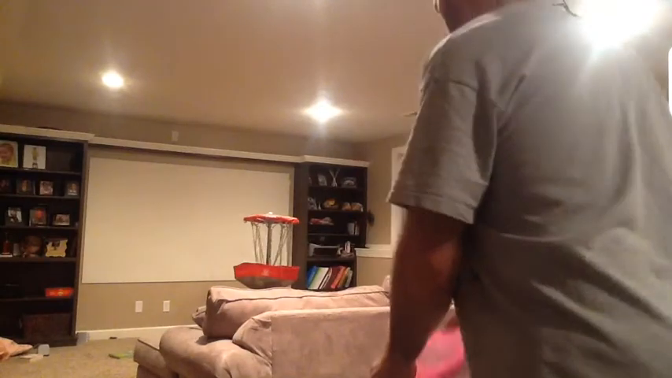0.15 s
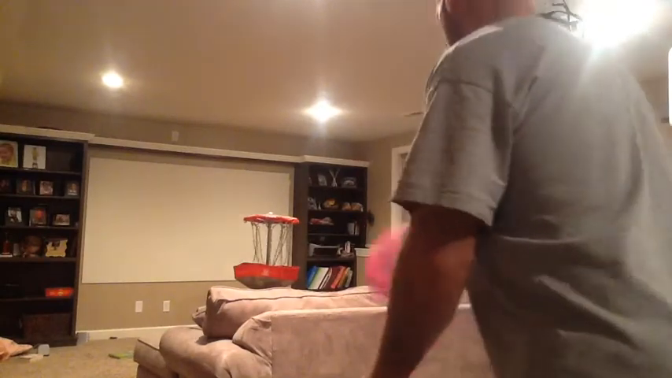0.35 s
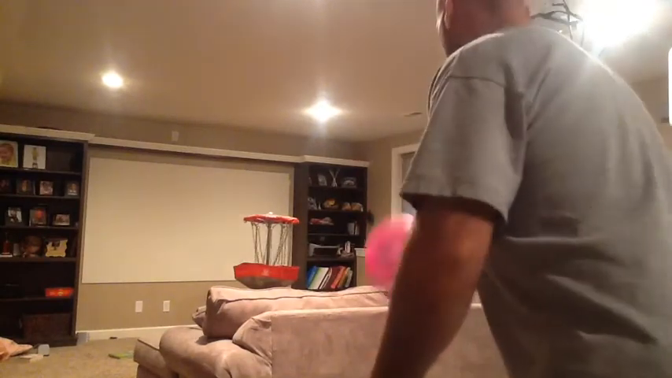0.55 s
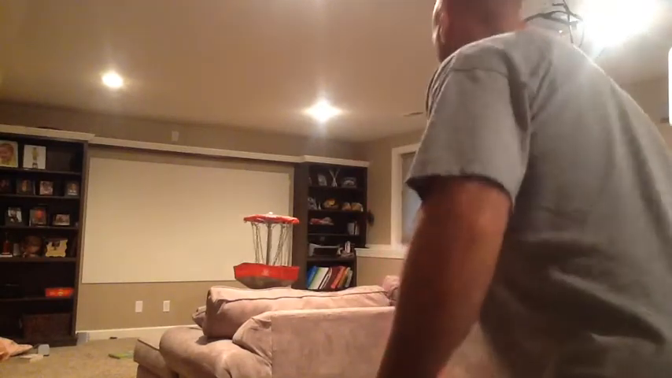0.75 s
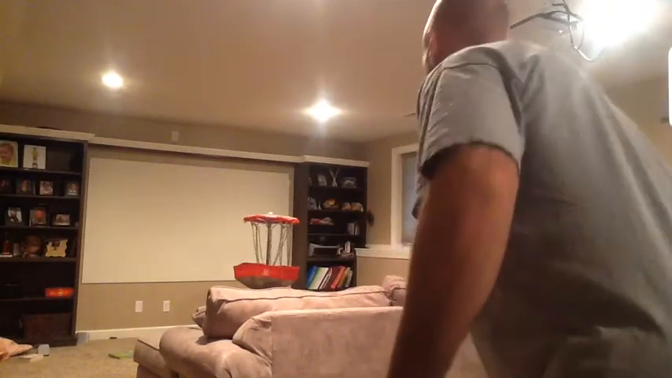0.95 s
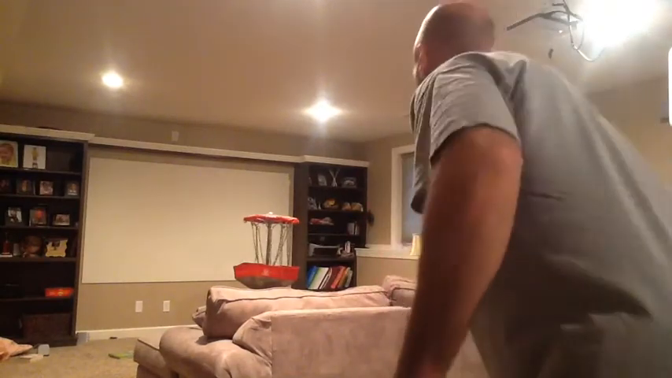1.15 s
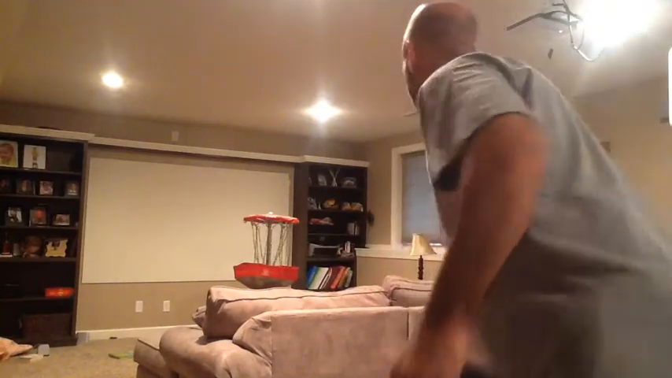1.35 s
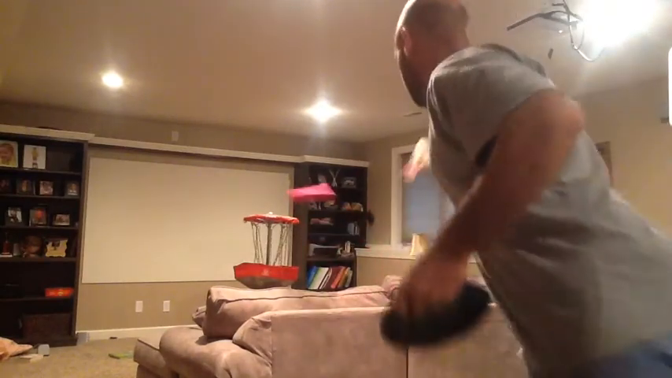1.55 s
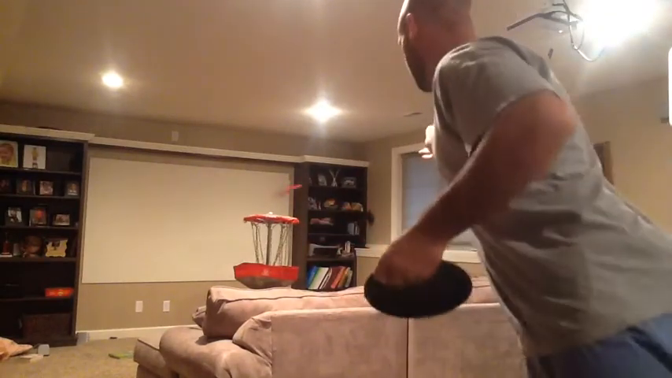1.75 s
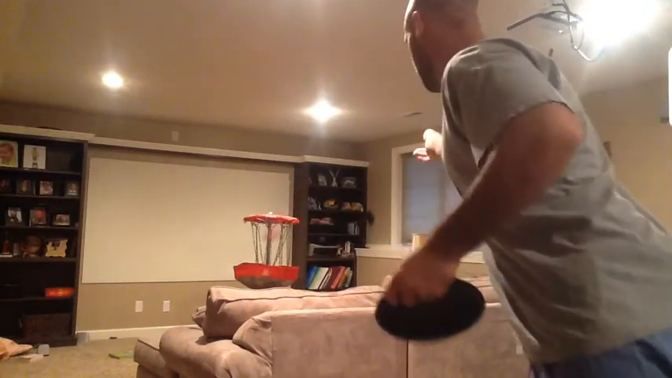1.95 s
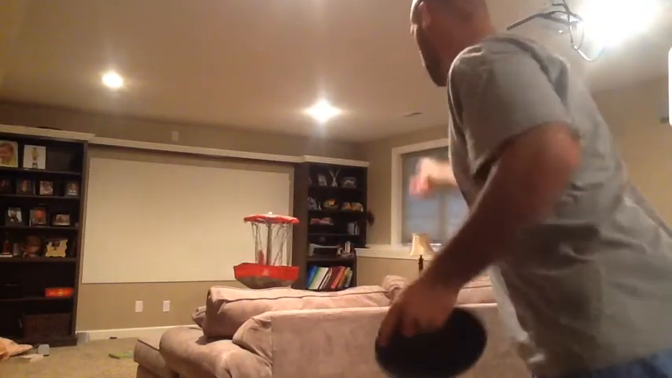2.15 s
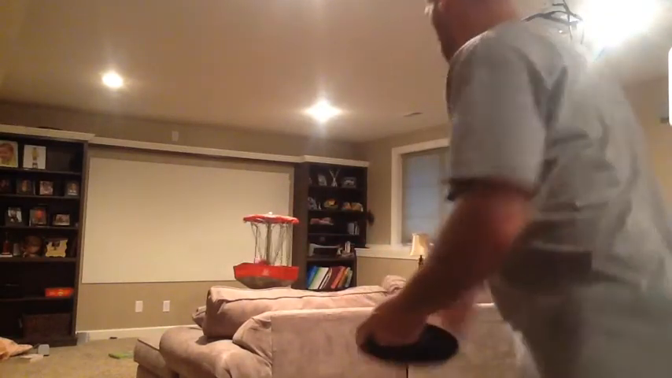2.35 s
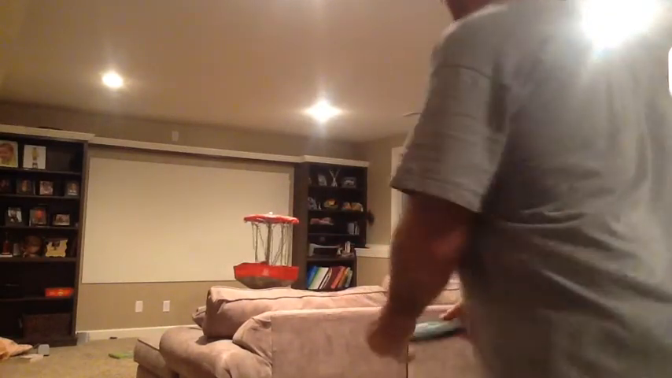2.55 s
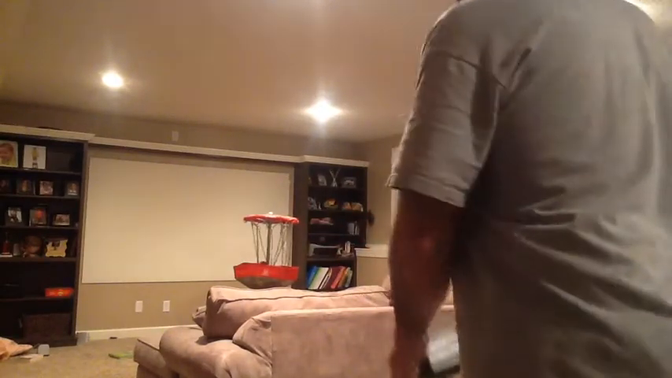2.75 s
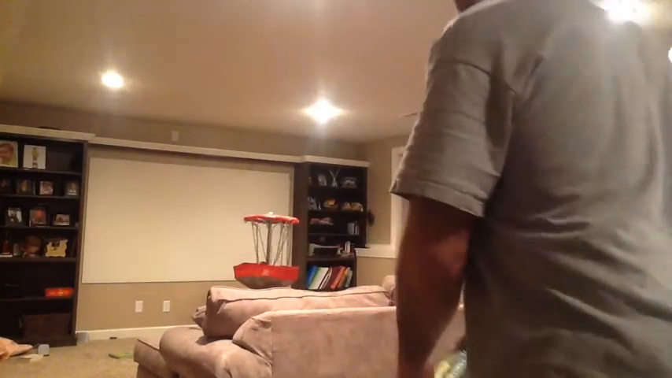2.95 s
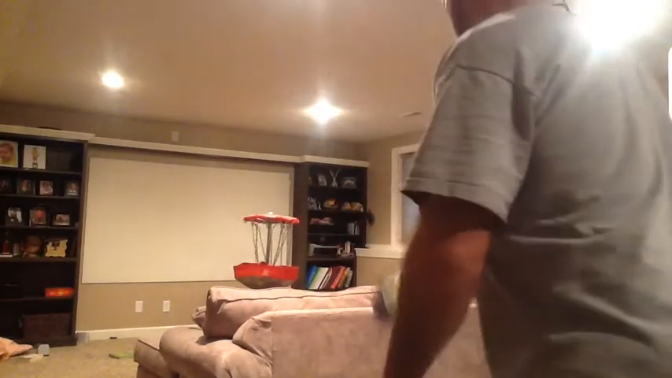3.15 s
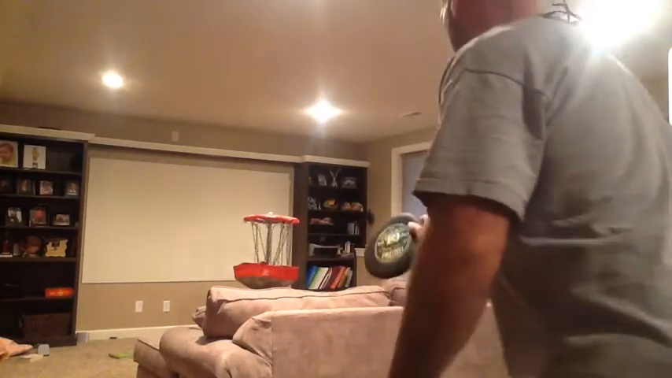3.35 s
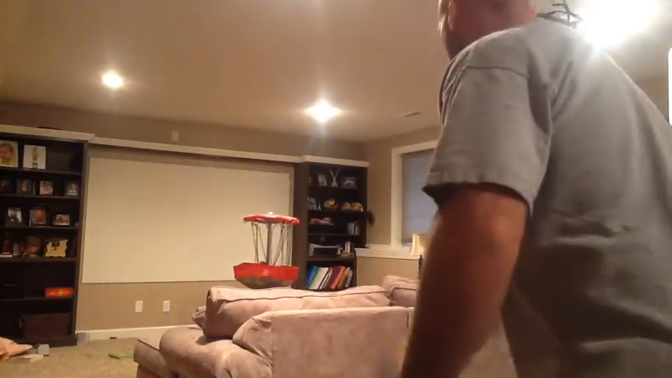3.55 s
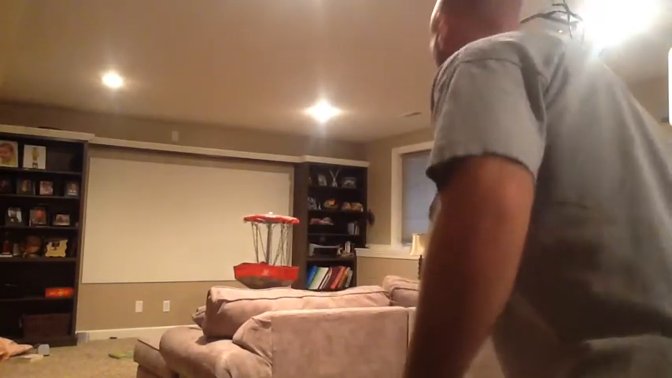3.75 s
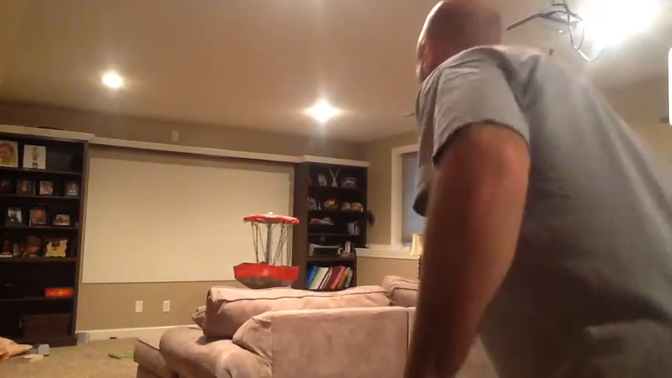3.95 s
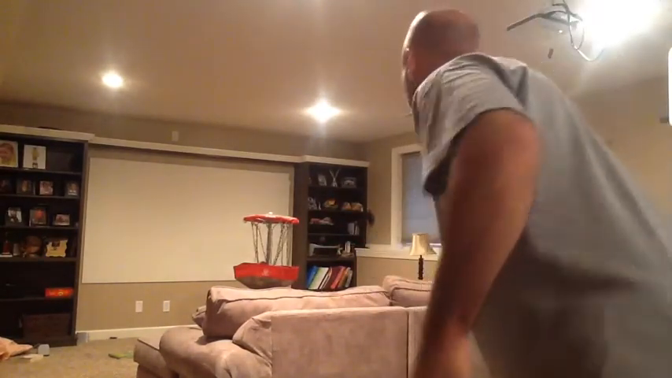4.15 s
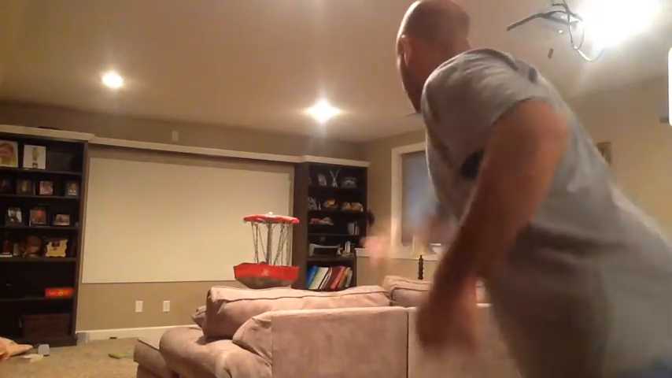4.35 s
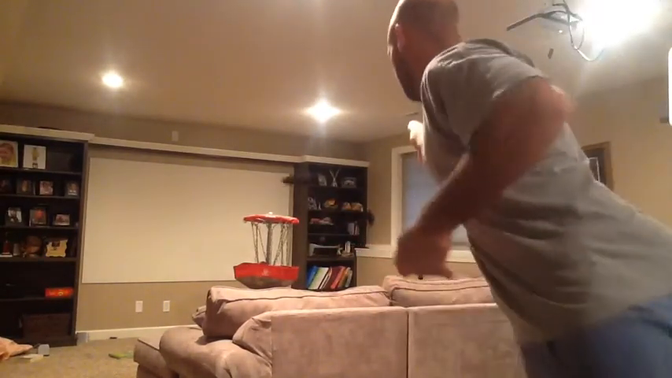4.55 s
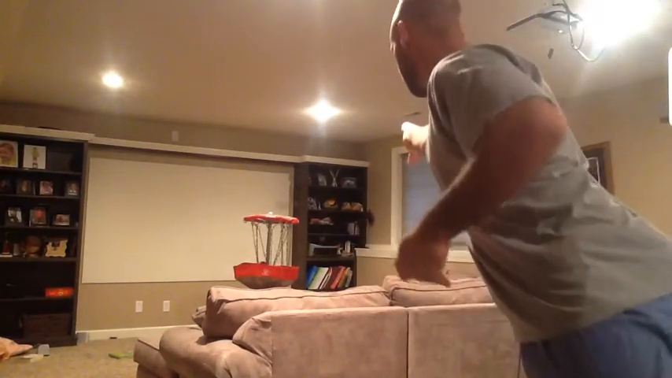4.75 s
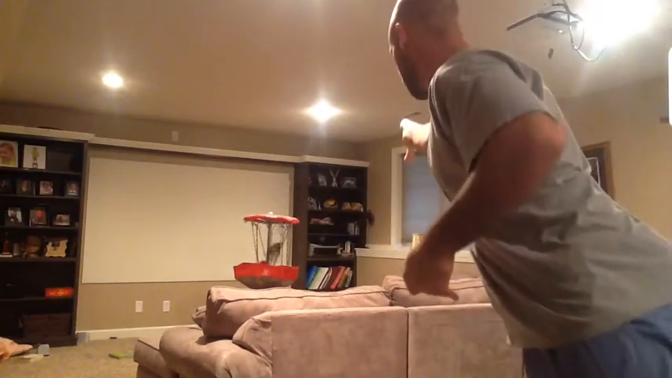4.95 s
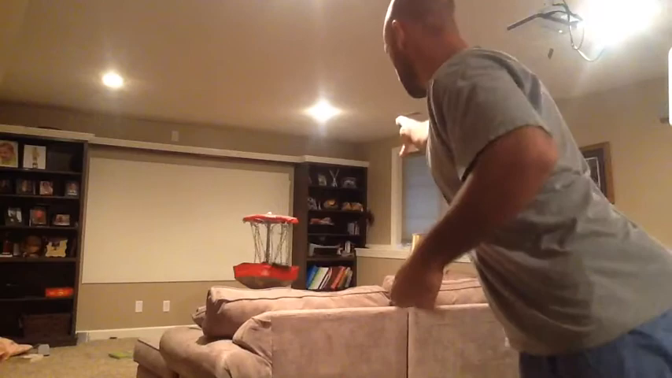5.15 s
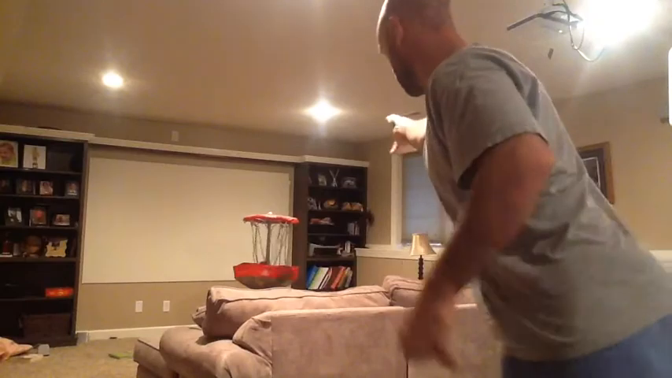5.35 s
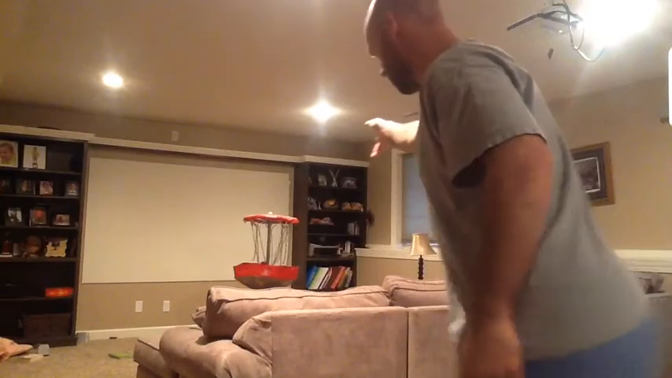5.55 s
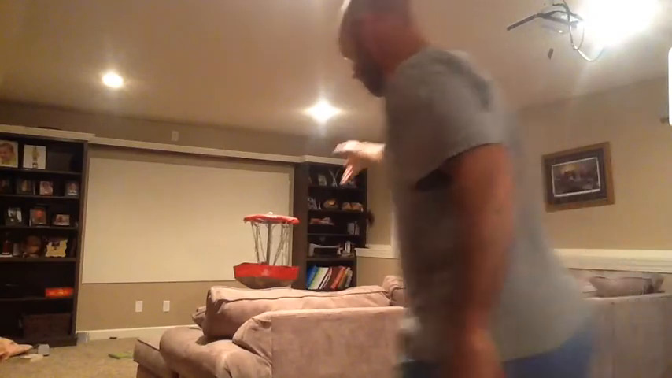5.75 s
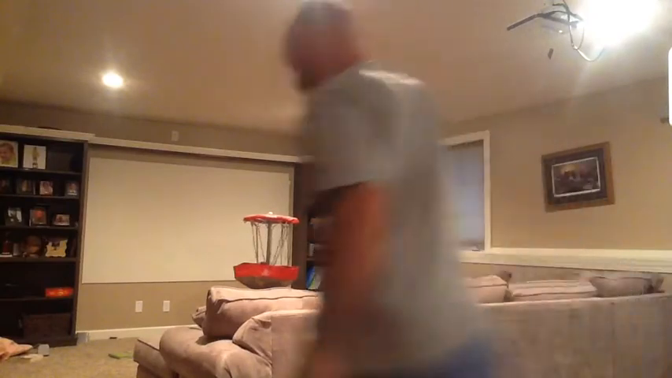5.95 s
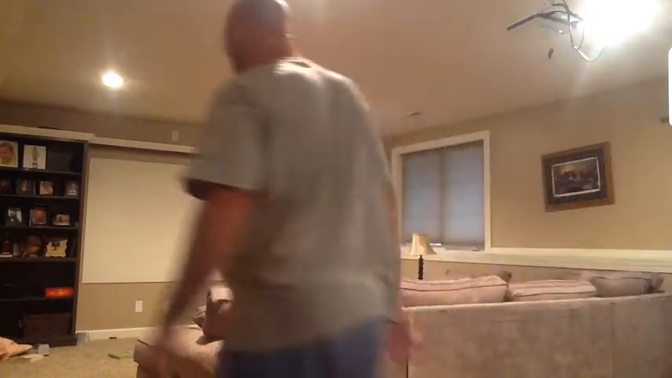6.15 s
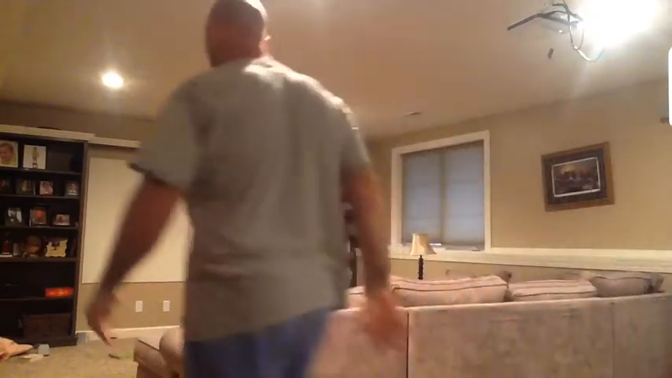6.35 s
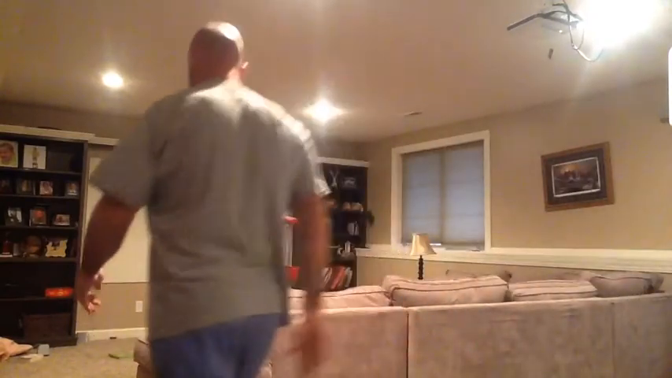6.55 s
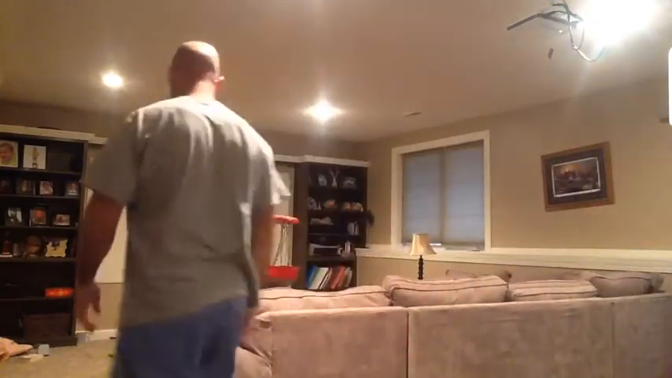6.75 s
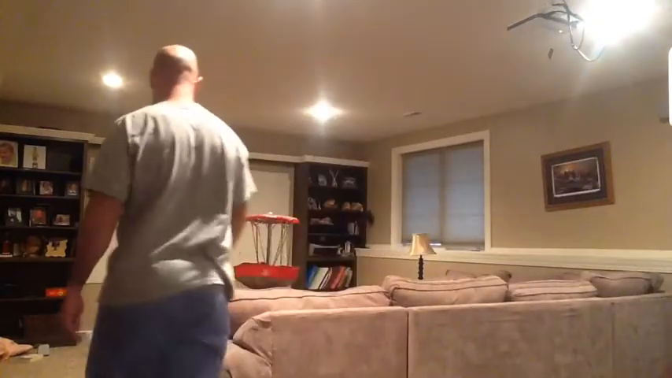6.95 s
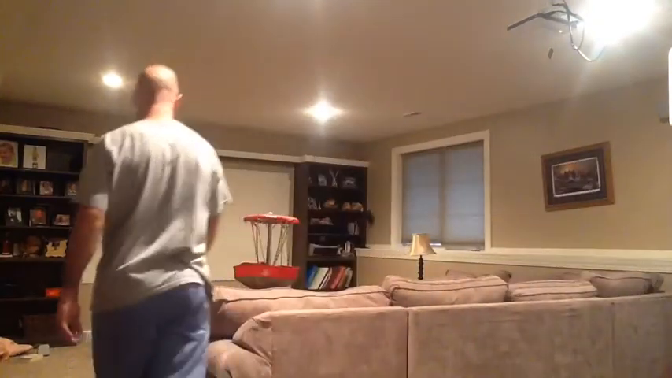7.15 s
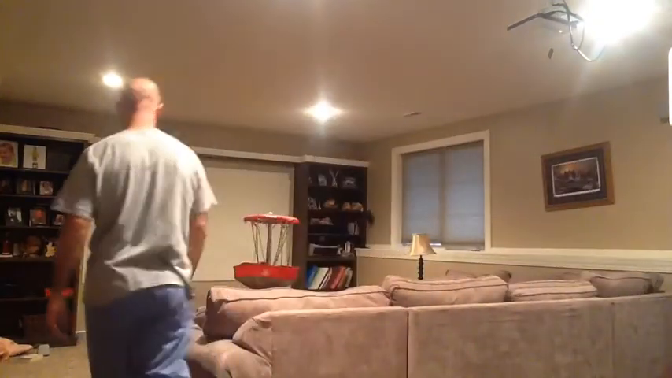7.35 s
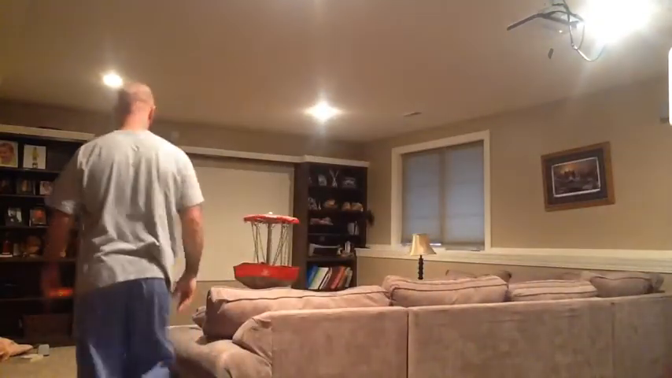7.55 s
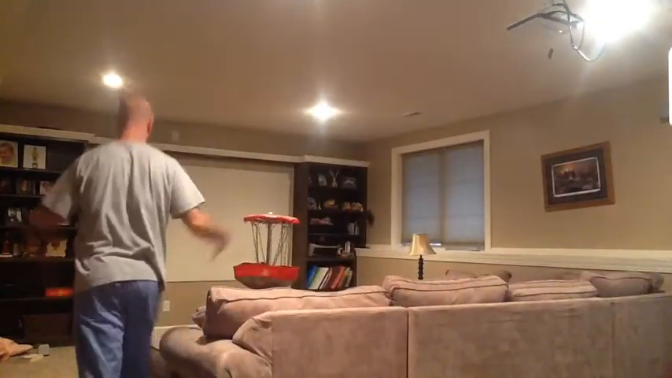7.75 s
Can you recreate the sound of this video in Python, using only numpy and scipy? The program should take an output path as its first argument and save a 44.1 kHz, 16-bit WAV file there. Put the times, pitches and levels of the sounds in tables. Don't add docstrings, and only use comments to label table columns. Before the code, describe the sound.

In a small carpeted room, cloth rustles close by, then two plastic discs crash into hanging chains seconds apart, jangling brightly over hiss.

```python
import sys
import numpy as np
from scipy import signal
from scipy.fft import rfft, irfft, next_fast_len
from scipy.io import wavfile
from scipy.ndimage import uniform_filter1d

SR = 44100
rng = np.random.default_rng(int(sys.argv[2]) if len(sys.argv) > 2 else 0)


def elevation(decibels):
    levels = np.asarray(decibels, float)
    return 10 ** (levels / 20)


def materialize(psi):
    bounded = np.clip(np.atleast_2d(psi).T, -1, 1)
    quanta = np.round(bounded * 32767).astype(np.int16)
    wavfile.write(sys.argv[1], SR, quanta)


N = 347949

LINK_HZ = 11100, 12950, 13990
# t/s, rattle level/dB, disc drumming level/dB, link clink level/dB
TANGLES = [(2.052, -26, -26, -24), (2.063, -25, -29.5, -22), (2.084, -13.5, -36.5, -20),
           (2.108, -26, -49.5, -28), (2.157, -27, -44.5, -26), (2.177, -28, -41, -28),
           (2.24, -40.5, -48, -36), (2.32, -47, -47, -42), (2.375, -45.5, -38.5, -38),
           (2.49, -57, -48, -31), (2.61, -56.5, -53.5, -44), (4.951, -25, -24.5, -20),
           (4.981, -18, -29.5, -14), (5.022, -29.5, -31.5, -22), (5.106, -29.5, -44.5, -30),
           (5.124, -26.5, -40.5, -24), (5.179, -36.5, -49, -34), (5.276, -34, -52, -34),
           (5.292, -31.5, -46, -21), (5.38, -40, -51, -27), (5.506, -45, -51, -36),
           (5.575, -25.5, -49, -20.5), (5.622, -39, -61.5, -36), (5.76, -50, -55, -38)]


def rms_one(x):
    return x / np.sqrt(np.mean(x ** 2) + 1e-20)


def at_hz(points, hz):
    point_hz, values = np.transpose(points)
    return np.interp(np.log(hz + 1), np.log(point_hz), values)


def colour(x, spectrum):
    size = next_fast_len(len(x))
    hz = np.fft.rfftfreq(size, 1 / SR)
    shaped = irfft(rfft(x, size) * elevation(at_hz(spectrum, hz)), size)
    return rms_one(shaped[:len(x)])


def ring(clicks, hz, t60):
    radius = elevation(-60 / (t60 * SR))
    angle = 2 * np.pi * hz / SR
    feedback = [1, -2 * radius * np.cos(angle), radius * radius]
    return signal.lfilter([0, np.sin(angle)], feedback, clicks + 1e-18)


def butter(x, order, hz, kind):
    return signal.sosfilt(signal.butter(order, hz, kind, fs=SR, output="sos"), x)


def add(out, s, sound):
    i = round(s * SR)
    out[i:i + len(sound)] += sound[:N - i]


def grains(per_s, spread_db):
    sizes = elevation(spread_db * np.minimum(rng.exponential(1, N), 4)) * rng.choice([-1, 1], N)
    return rms_one(sizes * (rng.random(N) < per_s / SR))


def flutter(depth_db, span):
    wander = uniform_filter1d(uniform_filter1d(rng.standard_normal(N), span), span)
    return elevation(depth_db * rms_one(wander))


def swells(moves):
    t = np.arange(N) / SR
    return sum(elevation(db) * np.exp(-((t - s) / half) ** 2) for s, db, half in moves)


def microphone_hiss():
    # f/Hz, density/dB
    hiss_spectrum = [(24, -52), (40, -22.5), (91, -23.5), (169, -5.5), (792, -12.5), (1400, -12),
                     (1760, -11), (1890, -12.5), (15300, -12)]
    # t/s, level/dB
    hiss_level = [(0, -64.5), (1.1, -63.5), (2.0, -63.5), (2.9, -66.5), (4.9, -63.5), (5.9, -62.5),
                  (6.7, -64.5), (7.89, -63)]
    level_db = np.interp(np.arange(N) / SR, *np.transpose(hiss_level))
    return colour(rng.standard_normal(N), hiss_spectrum) * elevation(level_db + 5.5)


def thrower():
    # middle t/s, level/dB, half length/s
    shuffles = [(.3, -64.5, .05), (.553, -71, .091), (1.398, -64, .063), (1.527, -64, .09),
                (1.81, -73, .28), (3.25, -76, .076), (4.218, -64, .073), (4.397, -63, .1),
                (4.7, -75.5, .14), (5.8, -63, .08), (6.07, -65.5, .075), (6.3, -68, .1), (6.48, -61.5, .12),
                (6.985, -59, .045), (7.1, -59.5, .08), (7.441, -68, .15), (7.64, -63.5, .13)]
    # f/Hz, density/dB
    rustle_spectrum = [(41, -52.5), (70, -22.5), (128, -1), (240, -3), (362, -3.5), (794, -6.5),
                       (1100, -15), (5000, -24.5), (6500, -48), (11000, -120)]
    # middle t/s, level/dB, half length/s
    throws = [
        (.47, -66, .07),
        (1.45, -64, .14),
        (4.33, -64, .1),
    ]
    house_rumble_db = -70
    lumps = rms_one(uniform_filter1d(rng.standard_normal(N), 1500))
    rustle = colour(rng.standard_normal(N) * elevation(2.5 * lumps), rustle_spectrum)
    sleeve = rms_one(butter(grains(per_s=2500, spread_db=3.0), 2, (400, 2000), "band"))
    return rustle * (elevation(house_rumble_db) + swells(shuffles)) + sleeve * swells(throws)


def clacks():
    # t/s, peak level/dB, bright part level/dB
    dull_clacks = [(.0024, -41.5, 2), (.0588, -32, -7), (.1174, -41.5, -5), (.2096, -50, -10),
                   (.4155, -33, 1), (.4678, -34, -5), (.5494, -39, -10), (.5807, -41, -6), (.9304, -47, -3),
                   (.969, -45, -20), (1.1777, -39, -8), (1.4295, -45.5, -7), (1.7853, -45.5, -3),
                   (2.3875, -30, -14), (2.6122, -41, -3), (2.931, -48, -14), (3.1333, -46, -8),
                   (3.1517, -37, -5.5), (3.6367, -40.5, -24.5), (4.336, -46, -7.5), (5.3814, -34, 3),
                   (5.4445, -29.5, -8.5), (5.6983, -36.5, 2), (5.7578, -31.5, -1.5), (5.8934, -43, -13),
                   (5.9665, -44, -10.5), (6.0371, -35.5, -6), (6.4028, -43.5, -17.5), (6.921, -48.5, -7.5),
                   (7.5804, -54, -1.5)]
    # t/s, peak level/dB, centre f/Hz
    pitched_clacks = [
        (4.9815, -15, 6640),
        (4.9815, -11, 4210),
        (5.1223, -22, 4940),
        (5.2939, -22, 5740),
        (5.544, -33, 5140),
        (6.1164, -42.5, 6610),
        (6.255, -48, 4500),
        (6.6887, -49, 4670),
        (7.0234, -49, 4430),
        (7.2078, -44, 6590),
    ]
    pitched_bright_db = -7
    out, t = np.zeros(N), np.arange(SR // 5) / SR
    centres = 4700 * (1 + .035 * rng.standard_normal(len(dull_clacks)))
    rows = [(s, db, hz, bright_db) for (s, db, bright_db), hz in zip(dull_clacks, centres)]
    rows += [(*row, pitched_bright_db) for row in pitched_clacks]
    for s, db, hz, bright_db in rows:
        noise = rng.standard_normal(len(t))
        bright = elevation(bright_db + 3.5) * signal.lfilter([1, 0, -1], [1], noise)
        hump = rms_one(ring(ring(noise, hz, 4.2 / hz), hz, 8.9 / hz))
        envelope = elevation(db - 10 - 60 * t / .14) * (1 - np.exp(-t / .0026))
        add(out, s, envelope * (hump + bright))
    return out


def links():
    # t/s, peak level/dB, second mode level/dB
    sway_clinks = [(.0169, -42, -26), (.0706, -39.5, -21), (.121, -55, -8), (.2124, -43.5, -13.5),
                   (.4304, -41.5, -10.5), (.4707, -41.5, -11.5), (.5462, -42, -13), (.584, -45, -10),
                   (.707, -46.5, -24), (.925, -32, 9.5), (.9624, -43.5, -10), (1.184, -48, -19),
                   (1.4281, -49.5, -3.5), (1.9161, -34, 4.5), (2.2111, -26.5, -13), (2.3524, -32.5, -1.5),
                   (2.3844, -30, -15.5), (2.4541, -36, -12), (2.576, -33, -11), (2.6304, -40.5, -4),
                   (2.7298, -37, -8), (2.740, -27, 2), (2.8258, -31, -7), (2.8794, -33.5, -18),
                   (2.953, -45, -12), (3.1567, -46, -11), (3.238, -52, -8), (3.6376, -52, -3),
                   (4.336, -55, -6), (4.9634, -15, -6.5), (5.0476, -27, -12), (5.0879, -30, -4),
                 (5.25, -35, -11.5), (5.6446, -32, -8), (5.6696, -34, -17.5), (5.892, -52, -8),
                 (5.965, -48.5, -13), (6.0211, -37, 5), (6.1169, -32, -2), (6.1435, -32, -10),
                 (6.248, -31, -8), (6.2694, -39, -2), (6.2933, -38.5, 3), (6.3133, -41, -4),
                 (6.3347, -29, -3), (6.3724, -32, -17), (6.918, -40, -7), (6.997, -38.5, 2.5),
                 (7.095, -35, -14), (7.204, -23, -33), (7.2132, -22, -27), (7.2294, -47, 18.5),
                 (7.2761, -43, -16), (7.5806, -53, -14)]
    mode_t60_s, detune_spread = (.21, .24, .24), .0055
    crash_second_db = -4
    out, t = np.zeros(N), np.arange(SR // 3) / SR
    clinks = sway_clinks + [(s, db, crash_second_db) for s, _, _, db in TANGLES]
    rise = 1 - np.exp(-t / .0025)
    for s, db, second_db in clinks:
        tick = butter(rng.standard_normal(len(t)), 3, [10500, 14500], "band")
        add(out, s, elevation(db - 7 - 60 * t / .1) * tick * rise)
        third_db = min(second_db, -2) - 3
        for hz, t60, mode_db in zip(LINK_HZ, mode_t60_s, (0, second_db, third_db)):
            detune = detune_spread * rng.standard_normal((3, 1)) * [[.5], [1.2], [1.7]]
            tones = np.sin(2 * np.pi * hz * (1 + detune) * t)
            add(out, s, elevation(db + mode_db - 6.5 - 60 * t / t60) * rise * ([.9, .55, .4] @ tones))
    return out


def pings():
    # t/s, peak level/dB, f/Hz, t60/s
    wire_pings = [(.0588, -37, 4330, .08), (.064, -42, 5400, .06), (.21, -52, 4300, .05),
                  (.276, -52, 4900, .05), (.416, -40, 5100, .05), (.551, -48, 4340, .05),
                  (.58, -50, 5000, .05), (.772, -51, 4900, .04), (.774, -53, 5700, .04),
                  (.967, -46, 5040, .05), (1.178, -39, 4850, .09), (2.053, -20, 3650, .04),
                  (2.063, -14, 5050, .04), (2.064, -16, 4300, .05), (2.078, -14, 4400, .04),
                  (2.084, -9, 4400, .06), (2.086, -11, 5900, .05), (2.086, -13, 7100, .04),
                  (2.097, -13, 5200, .04), (2.114, -17, 5600, .04), (2.164, -18, 5900, .05),
                  (2.169, -14, 4170, .05), (2.178, -17, 4900, .05), (2.186, -18, 3800, .05),
                  (2.386, -32, 4380, .06), (2.613, -46, 4200, .06),
                  (4.961, -20, 4240, .04), (4.968, -18, 4900, .03), (4.981, -11, 6640, .04),
                    (4.982, -5, 4400, .05), (4.982, -12, 5900, .04), (4.982, -13, 7200, .04),
                    (4.986, -9, 3650, .05), (5.009, -14, 4450, .04), (5.107, -19, 6700, .04),
                    (5.123, -15, 7600, .05), (5.125, -16, 5900, .04), (5.135, -16, 4900, .05),
                    (5.15, -22, 5400, .06), (5.277, -22, 5890, .03), (5.293, -17, 5880, .05),
                    (5.297, -24, 4500, .04), (5.32, -26, 3950, .06), (5.444, -31, 5000, .03),
                    (5.446, -33, 6100, .05), (5.516, -36, 6050, .05), (5.545, -28, 5100, .07),
                    (5.576, -20, 4370, .04), (5.577, -21, 6600, .05), (5.586, -17, 5900, .06),
                    (5.587, -20, 5000, .05), (5.587, -17, 3690, .05), (5.61, -24, 3900, .06),
                    (5.7, -32, 7500, .04), (5.758, -36, 5900, .04),
                  (.09, -47, 4200, .06), (.121, -49, 4600, .06), (.124, -52, 5400, .05),
                   (.16, -52, 4700, .05), (.478, -45, 4400, .05), (.505, -49, 5600, .05),
                   (.63, -54, 4600, .05), (3.58, -55, 4500, .04), (2.345, -34, 4300, .05),
                   (2.43, -40, 4100, .05), (2.482, -45, 4500, .05), (2.535, -46, 4300, .04),
                   (2.582, -48, 4100, .04), (2.628, -40, 5000, .05), (2.64, -48, 4000, .05),
                   (2.672, -52, 4400, .05), (2.72, -54, 4300, .06), (3.135, -52, 4900, .05),
                   (3.165, -46, 4500, .08), (3.19, -50, 4300, .06), (3.215, -53, 4500, .06),
                   (5.24, -28, 5200, .04), (6.372, -48, 4600, .05), (6.7, -53, 4900, .05)]
    # pitch ratio, level/dB
    neighbours = [(1, 0), (1.035, -5), (.955, -7)]
    out, t = np.zeros(N), np.arange(SR // 6) / SR
    for s, db, hz, t60 in wire_pings:
        tones = sum(elevation(near_db) * np.sin(2 * np.pi * hz * ratio * t) for ratio, near_db in neighbours)
        add(out, s, elevation(db - 4 - 60 * t / t60) * (1 - np.exp(-t / .0006)) * tones)
    return out


def knocks():
    # t/s, peak level/dB, f/Hz, t60/s
    disc_knocks = [(1.451, -45, 875, .2), (2.058, -31, 851, .15), (2.38, -42.5, 872, .3),
                   (2.893, -52, 860, .2), (3.22, -58, 867, .14), (4.351, -48, 1200, .07),
                   (4.36, -48, 791, .11), (4.65, -48, 440, .048), (4.953, -22, 1030, .1),
                   (4.962, -19, 1100, .1), (4.964, -23, 565, .1), (5.506, -47, 828, .12),
                   (5.58, -43, 870, .12), (5.826, -46, 1200, .1), (5.83, -45, 656, .09)]
    # t/s, peak level/dB, f/Hz, t60/s
    thuds = [
        (.29, -53, 170, .067),
        (.549, -51.5, 150, .15),
        (5.312, -48, 265, .2),
        (5.614, -27, 205, .1),
        (5.64, -36, 215, .2),
        (5.69, -39, 195, .12),
        (5.75, -49, 160, .12),
        (5.999, -46, 187, .12),
        (7.592, -49, 250, .058),
    ]
    out, t = np.zeros(N), np.arange(SR // 3) / SR
    # pitch ratio, dB
    rows = [(*row, .55, -5) for row in disc_knocks] + [(*row, 2.05, -5) for row in thuds]
    for s, db, hz, t60, ratio, other_db in rows:
        scuff = rng.standard_normal(len(t)) * elevation(-60 * t / .06) * (1 - np.exp(-t * hz / .7))
        modes = ring(scuff, hz, t60) + elevation(other_db) * ring(scuff, ratio * hz, .8 * t60)
        puff = butter(scuff, 4, [.62 * hz, 1.7 * hz], "band")
        add(out, s, elevation(db) * (modes / np.abs(modes).max() + .9 * puff / np.abs(puff).max()))
    return out


def pole(rattle):
    # t/s, upper family level/dB, lower family level/dB against it
    pole_hits = [(1.1802, -49, -15), (2.0862, -1, -17), (2.0902, -1, -21), (2.0944, -2.5, -21),
                 (2.0985, -8, -9), (2.1094, -18, -4), (2.1264, -23, -3), (2.1644, -20, -8),
                 (2.1735, -14, -5), (2.1804, -19, -9), (2.1894, -26, -7), (2.2224, -27, -5),
                 (2.2914, -33, -3), (4.9841, -12, -16), (4.9914, -10, -17), (5.1064, -16, -10),
                 (5.1183, -13.5, -7), (5.1244, -7, -9), (5.144, -11, -10), (5.1921, -17, -20),
                 (5.2764, -19, -12.5), (5.2934, -11, -17), (5.3004, -18, 0), (5.364, -23, -7),
                 (5.5772, -12, -10), (5.5857, -16.5, -3), (5.5994, -24, 5), (5.6834, -32, -11)]
    # f/Hz, level/dB, t60/s
    high_modes = [(9020, -14, .1), (9115, -1, .14), (9230, -8, .25), (9297, -11, .12), (9458, -12, .07),
                  (9590, -14, .06), (9670, -16, .07), (10126, -23, .14)]
    # f/Hz, level/dB, t60/s
    low_modes = [(3315, -9, 1.2), (3252, -6, .48), (3290, -5, .45), (3349, -4, .38), (3415, -8, .22),
                 (3465, -5, .24), (3617, -6, .18), (3767, -8, .16), (3957, -10, .14), (4211, -8, .1),
                 (4400, -7, .1)]
    # t/s, level/dB added above the first two
    landing = [
        (2.09, 6),
        (2.13, 3),
        (2.2, 9),
        (4.99, 4),
        (5.11, 3),
        (5.19, 7),
        (5.28, -3),
        (5.37, 0),
        (5.58, 8),
    ]
    s, high_db, low_db = np.transpose(pole_hits)
    high_db = np.minimum(high_db, 0)
    at, out = np.round(s * SR).astype(int), np.zeros(N)
    side_db = np.interp(s, *np.transpose(landing))
    families = [(mode, high_db - 11 + side_db * (k > 1), -43) for k, mode in enumerate(high_modes)]
    families += [(mode, high_db + low_db - 14.5, -49) for mode in low_modes]
    for (hz, db, t60), blow_db, hum_db in families:
        clicks = elevation(db + hum_db) * rattle
        luck_db = 2.5 * rng.standard_normal(len(at))
        clicks[at] += elevation(blow_db + db + luck_db) * rng.choice([-1, 1], len(at))
        out += ring(clicks, hz, t60)
    return butter(out, 4, 2900, "high")


def chime(shake):
    blows, dealt = shake * grains(per_s=3500, spread_db=3.0), rng.integers(0, 24, N)
    pitches = np.geomspace(3500, 8600, 24) * (1 + .01 * rng.standard_normal(24))
    return sum(ring(blows * (dealt == k), hz, .045) for k, hz in enumerate(pitches))


def tangle():
    # f/Hz, density/dB
    rattle_spectrum = [(880, -39), (1500, -14), (2200, -8.5), (2820, -12.5), (3360, -3), (3890, 0),
                       (7530, -8.5), (9320, -3), (10300, -0.5), (13400, -4.5), (15300, -7)]
    # f/Hz, density/dB
    drumming_spectrum = [(65, -47), (110, -25), (199, 0.5), (342, -5.5), (563, -1), (795, 0), (876, 0.5),
                         (1360, -3), (3000, -12), (3900, -32), (6600, -120)]
    longer_s_per_db = .015
    shake, drum, t = np.zeros(N), np.zeros(N), np.arange(SR // 2) / SR
    for s, rattle_db, drum_db, _ in TANGLES:
        rattle_t60 = np.clip(.1 + longer_s_per_db * (-14 - rattle_db), .05, .55)
        drum_t60 = np.clip(.25 + longer_s_per_db * (-26 - drum_db), .05, .6)
        rise = 1 - np.exp(-t / (.0022 * elevation(-.7 * (rattle_db + 20.5))))
        add(shake, s, rise * elevation(2 * (rattle_db - 60 * t / rattle_t60)))
        add(drum, s, rise * elevation(2 * (drum_db - 60 * t / drum_t60)))
    shake, drum = np.sqrt(shake), np.sqrt(drum)
    rattle = colour(grains(per_s=2600, spread_db=3.3), rattle_spectrum) * shake * elevation(6.0)
    swing = shake * grains(per_s=400, spread_db=8.0)
    pitches = (1 + .009 * rng.standard_normal((5, 1))) * LINK_HZ
    jingle = sum(ring(np.roll(swing, 37 * k), hz, .04) for k, hz in enumerate(pitches.ravel()))
    drumming = colour(grains(per_s=3000, spread_db=2.5), drumming_spectrum) * drum * elevation(-.5)
    crash = rattle + elevation(-41) * jingle + elevation(-22) * chime(shake) + drumming
    contacts = shake * grains(per_s=3200, spread_db=7.0)
    return crash, contacts


def rings():
    # t/s, peak level/dB, f/Hz, t60/s
    clear_rings = [(2.086, -3, 9250, .08), (2.087, -19, 3442, .1), (2.093, 0, 9115, .1),
                   (2.101, -22, 3273, .2), (2.148, -24, 3257, .35), (2.157, -16, 9200, .08),
                   (2.165, -14, 9119, .1), (2.174, -13, 9230, .08), (2.188, -21, 9296, .15),
                   (2.22, -34, 3305, .25), (2.222, -22, 9280, .2), (2.268, -39, 3280, .35),
                   (2.29, -43, 3391, .2), (2.06, -25, 12970, .08), (2.074, -22, 11040, .08),
                   (2.358, -33, 11040, .2), (2.36, -35, 12922, .3), (2.388, -30, 11030, .12),
                   (2.41, -40, 13027, .2),
                   (4.96, -17, 13019, .08), (4.984, -15, 9310, .12), (4.988, -24, 3469, .2),
                    (5.016, -13, 11020, .22), (5.018, -22, 12987, .08), (5.08, -28, 9280, .2),
                    (5.087, -22, 11110, .15), (5.107, -12, 9255, .12), (5.108, -26, 3297, .12),
                    (5.123, -22, 3404, .1), (5.129, -7.5, 9118, .2), (5.146, -19, 3353, .16),
                    (5.191, -20, 9282, .28), (5.283, -29, 3290, .5), (5.293, -14, 9105, .2),
                    (5.302, -26, 3290, .45), (5.365, -33, 3292, .35), (5.381, -33, 14055, .09),
                    (5.386, -30, 13005, .2), (5.508, -32, 12865, .2), (5.528, -33, 12950, .2),
                    (5.543, -28, 11060, .15), (5.577, -17, 9200, .1), (5.578, -28, 3294, .3),
                    (5.586, -14, 9242, .2), (5.59, -23, 10839, .07), (5.595, -23, 3343, .25),
                    (5.638, -39, 13880, .3), (5.662, -33, 3320, .5), (5.673, -28, 11040, .1),
                    (5.675, -34, 12954, .15), (5.772, -39, 11111, .15), (7.222, -40, 13980, .25)]
    out, t = np.zeros(N), np.arange(SR // 2) / SR
    for s, db, hz, t60 in clear_rings:
        tone = np.sin(2 * np.pi * hz * t)
        twin = .3 * (hz > 8000) * np.sin(2 * np.pi * 1.0126 * hz * t)
        add(out, s, elevation(db + 1.5 - 60 * t / t60) * (1 - np.exp(-t / .001)) * (tone + twin))
    return out


def room(x):
    # f/Hz, t60/s
    room_t60 = [(100, 0.16), (1000, 0.12), (4000, 0.13), (15000, .2)]
    t, tail = np.arange(SR // 2) / SR, 0
    white = rng.standard_normal(len(t)) * np.clip((t - .003) / .0027, 0, 1)
    for low in 60 * 2 ** np.arange(9):
        octave = butter(white, 2, [low, min(2 * low, .45 * SR)], "band")
        tail = tail + octave * elevation(-60 * t / at_hz(room_t60, .47 * low))
    tail_db = -8
    return x + elevation(tail_db) * signal.fftconvolve(x, tail / np.sqrt(np.sum(tail ** 2)))[:N]


def gapped_treble(x):
    # f/Hz, level/dB
    gap_depth = [(11600, 27), (13500, 22), (15300, 22)]
    hz, _, frames = signal.stft(x, SR, nperseg=1024)
    power = (np.abs(frames[:512]) ** 2).reshape(64, 8, -1).sum(axis=1)
    db = 10 * np.log10(uniform_filter1d(power, size=3, axis=1) + 1e-20)
    centre = hz[4:512:8]
    margin_db = np.where(centre > gap_depth[0][0], at_hz(gap_depth, centre), 200)[:, None]
    loudest_db = db[centre > 10500].max(axis=0)
    frames[:512] *= np.repeat(db > loudest_db - margin_db, 8, axis=0)
    return signal.istft(frames, SR, nperseg=1024)[1][:N]


def scene():
    crash, contacts = tangle()
    steel = links() * flutter(3.0, 120) + (pole(contacts) + rings()) * flutter(1.5, 200)
    basket = steel + clacks() + pings() + knocks() + crash
    basket = butter(basket, 4, 105, "high")
    heard = butter(room(basket) + thrower(), 3, 90, "high")
    return (heard + microphone_hiss())[None]


def top_cut(x):
    return signal.sosfilt(signal.butter(12, 15620, fs=SR, output="sos"), x)


def record(dry):
    smooth = signal.sosfilt(signal.cheby2(16, 50, 15650, fs=SR, output="sos"), dry)
    uneven = smooth + .013 * smooth ** 2
    clipped = np.clip(uneven, -.99, .99)
    mix = gapped_treble(clipped[0])[None]
    return top_cut(mix)


dry = scene()
out = record(dry)
materialize(out)
```